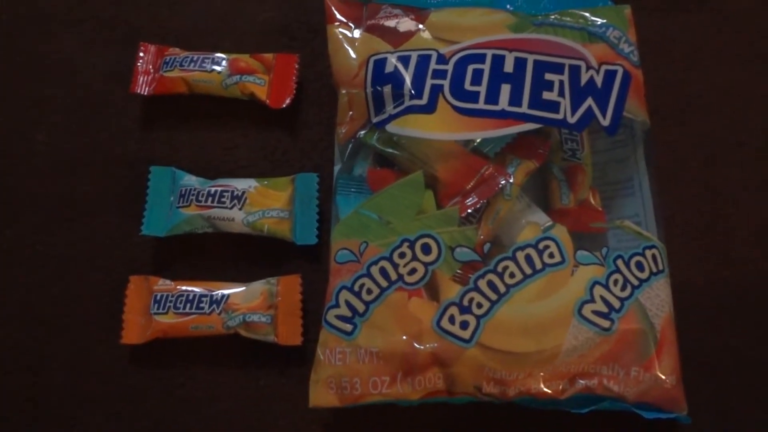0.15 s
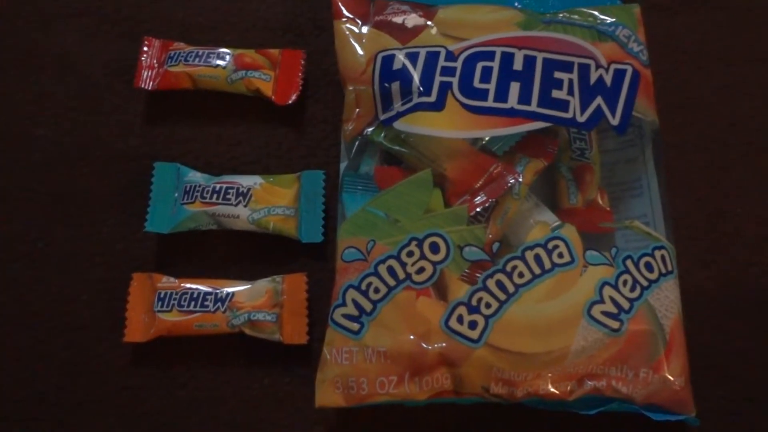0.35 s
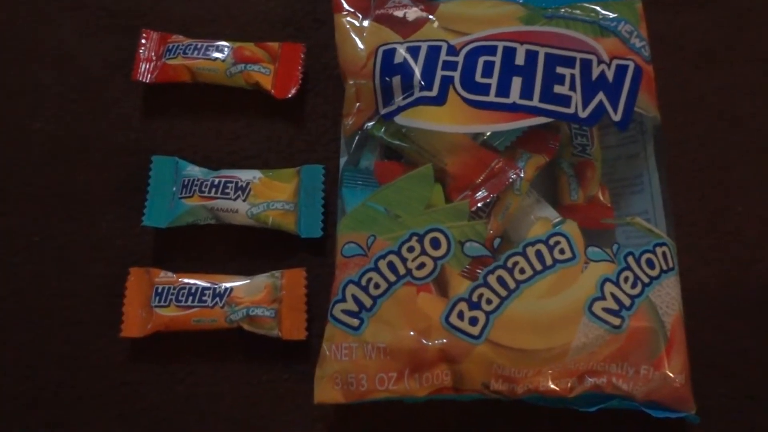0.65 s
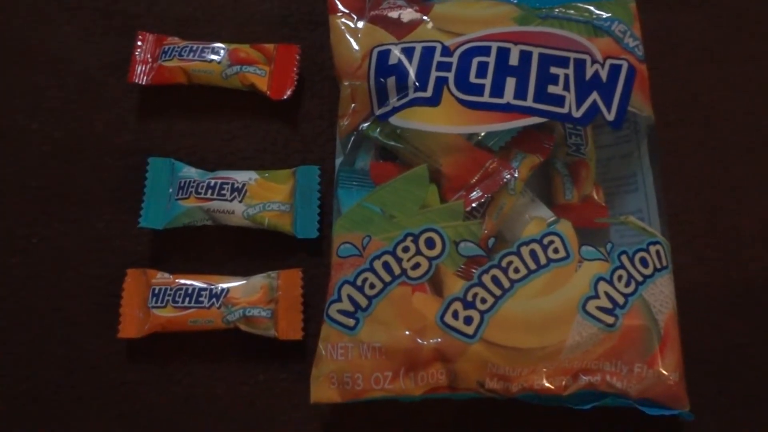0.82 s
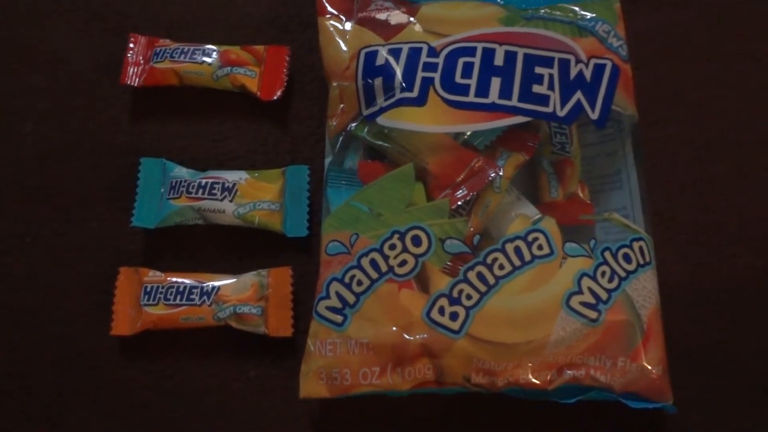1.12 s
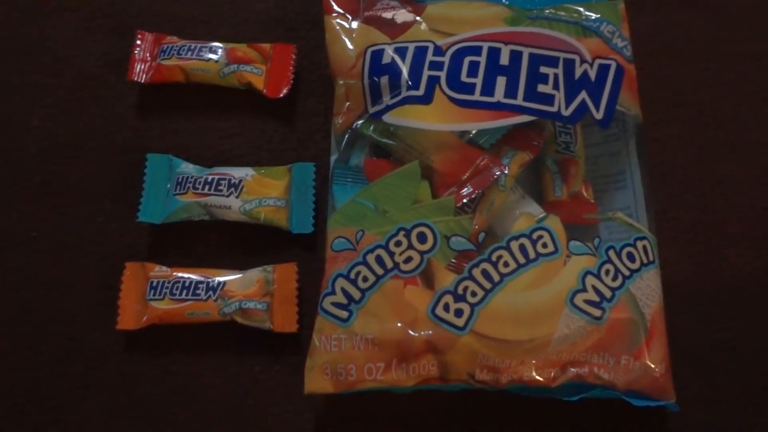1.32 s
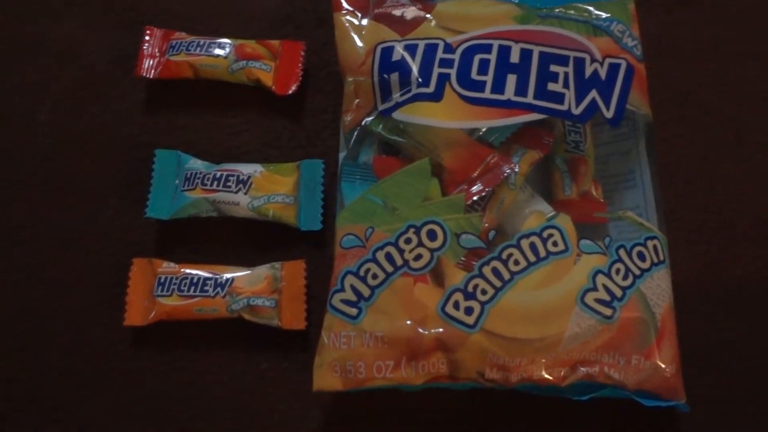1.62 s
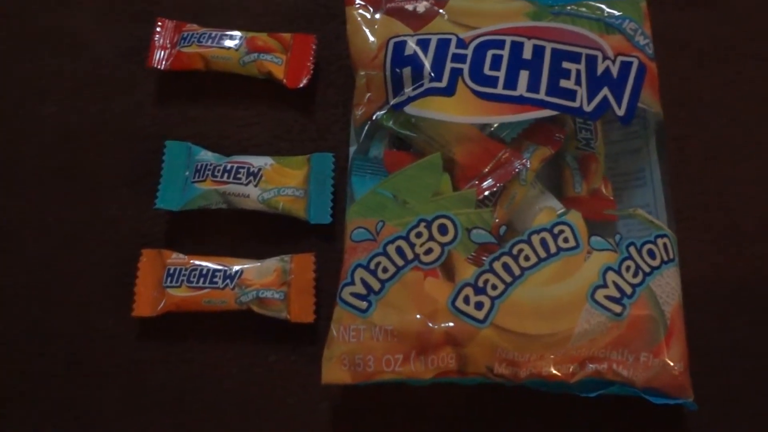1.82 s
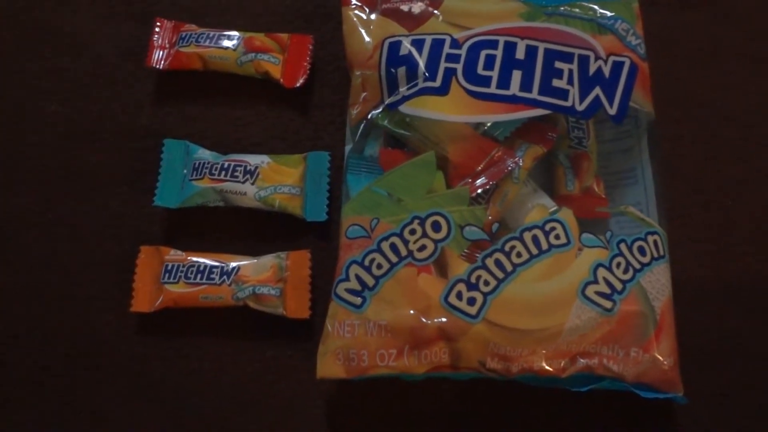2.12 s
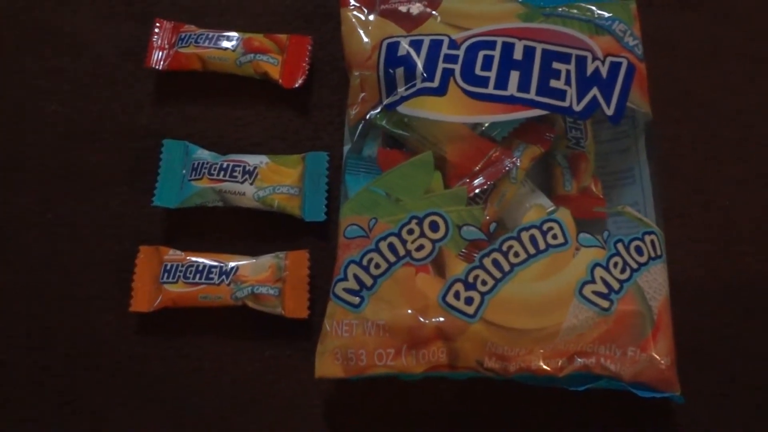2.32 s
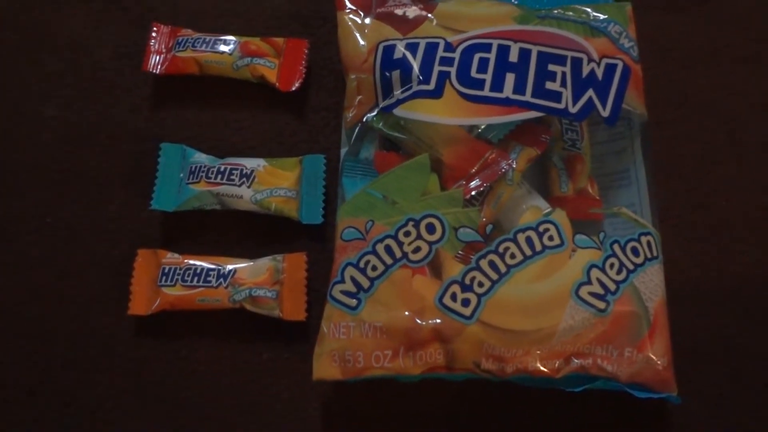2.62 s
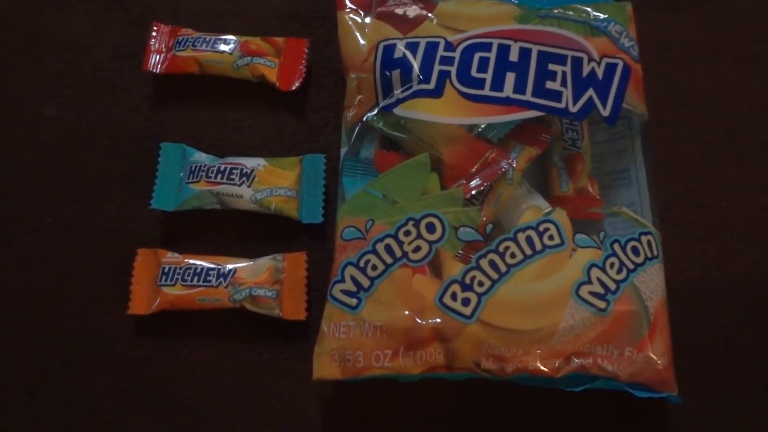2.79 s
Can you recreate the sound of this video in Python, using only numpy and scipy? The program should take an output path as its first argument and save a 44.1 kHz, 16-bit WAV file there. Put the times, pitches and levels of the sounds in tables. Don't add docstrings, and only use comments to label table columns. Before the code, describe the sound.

A small plastic candy wrapper crinkles sharply as fingers twist it open in a quiet room.

```python
import sys
import numpy as np
from scipy import signal
from scipy.fft import rfft, irfft, next_fast_len
from scipy.io import wavfile
from scipy.ndimage import uniform_filter1d, minimum_filter1d

SR = 44100
rng = np.random.default_rng(int(sys.argv[2]) if len(sys.argv) > 2 else 0)


def invert_db(x):
    u = np.asarray(x, float) / 20
    return 10 ** u


def generate_wav(sig):
    pcm = np.round(np.clip(np.atleast_2d(sig).T, -1, 1) * 32767).astype(np.int16)
    wavfile.write(sys.argv[1], SR, pcm)


N = 130095

# (frequency [Hz], density [dB per Hz])
AIR_CENTRE = [(25, -2), (50, -4), (120, -2), (400, -5), (840, -10), (1600, -14), (4000, -17.5),
              (15000, -15.5)]
AIR_DIFFERENCE = [(25, -31), (100, -12), (330, -4), (620, -6), (1500, -9.5), (3600, -16), (8000, -26.5),
                  (15000, -35)]
# (frequency [Hz], level [dB])
FILM_COLOUR = [(450, -33), (1200, -18.5), (2300, -1), (3500, -1.5), (4600, 2.5), (6300, 1), (10500, 0.5),
               (14500, -2)]
# (start [s], hold [s], level [dB], treble over low [dB])
SQUEEZES = [(0.02, 0.081, -55, -7), (0.175, 0.041, -51, -10), (0.206, 0.017, -44, 7),
            (0.253, 0.0062, -38.5, 4), (0.281, 0.0076, -28.5, 0), (0.328, 0.062, -51.5, -6),
            (0.469, 0.0068, -37, -6.5), (0.52, 0.063, -59, -22), (0.582, 0.02, -27.5, 0),
            (0.63, 0.011, -41.5, 17), (0.737, 0.11, -51.5, -5), (0.825, 0.051, -42, -0.5),
            (0.908, 0.063, -50.5, -11), (1.059, 0.16, -41, 3), (1.258, 0.085, -41, -3),
            (1.417, 0.083, -49.5, -8.5), (1.556, 0.048, -38, 9), (1.713, 0.03, -43.5, -13),
            (1.816, 0.02, -40.5, 11), (1.873, 0.013, -52, 14), (1.934, 0.014, -44, 13),
            (1.962, 0.085, -36, 4.5), (2.108, 0.084, -41.5, 15), (2.21, 0.067, -50, 0),
            (2.324, .015, -37.5, 1), (2.383, 0.025, -45.5, -8), (2.427, 0.039, -35.5, 21),
            (2.5, 0.091, -54.5, 26), (2.58, 0.071, -41, 13), (2.8, 0.17, -54.5, -9.5)]
# (start [s], end [s], pitch [Hz], level [dB], glide [Hz per s])
TAUT_PANELS = [(0.317, 0.434, 3160, -22, 0), (0.581, 0.592, 750, -16, 0), (1.08, 1.208, 4600, -29, -2),
               (1.266, 1.361, 6250, -7, 13000), (1.272, 1.352, 3540, -8, 0), (1.564, 1.628, 2190, -11.5, 0),
               (2.478, 2.67, 3160, -7, 2), (2.804, 2.87, 6220, -0.5, -2), (2.82, 2.883, 7640, -7, 0),
               (2.815, 2.923, 9650, -14, 2), (2.864, 2.96, 3200, -4.5, 0), (1.236, 1.343, 2420, -8, 0)]
# (time [s], level [dB], main pitch [Hz])
CREASE_SNAPS = [(0.025, -38.5, 9000), (0.0568, -44, 12600), (0.0838, -38.5, 6260), (0.2057, -24.5, 6070),
                (0.2633, -32, 6740), (0.2777, -29, 10700), (0.2864, -18.5, 9500), (0.3015, -28, 9900),
                (0.3213, -29, 5360), (0.3252, -21.5, 1890), (0.364, -40, 8600), (0.467, -30, 5900),
                (0.475, -32.5, 13300), (0.5189, -43, 4100), (0.588, -15, 9700), (0.597, -25.5, 3600),
                (0.6071, -27, 8900), (0.6497, -34, 2360), (0.6886, -39, 2260), (0.7105, -39.5, 6000),
                (0.8065, -42.5, 9300), (0.8316, -39.5, 4570), (0.8628, -34, 6350), (0.9177, -34, 4600),
                (0.926, -28, 12300), (0.9653, -37.5, 2160), (0.974, -37, 6000), (1.031, -48, 2160),
                (1.0742, -21, 4930), (1.108, -33, 6800),
                (1.1114, -30.5, 5940), (1.118, -27.5, 4840), (1.129, -30.5, 11500), (1.137, -30, 6600),
                (1.1424, -23, 5630), (1.1497, -12.5, 5100), (1.1707, -23.5, 5260), (1.174, -28, 5070),
                (1.273, -48, 2520), (1.368, -38, 3760), (1.4102, -30.5, 4900), (1.4526, -28, 6600),
                (1.5524, -17.5, 6560), (1.5702, -23, 6540), (1.5984, -32.5, 4500), (1.6046, -30.5, 4900),
                (1.6113, -25, 11200), (1.694, -41.5, 6600), (1.721, -34, 9000), (1.747, -40.5, 7700),
                (1.83, -21, 6400), (1.849, -30.5, 6550), (1.872, -25.5, 7760), (1.8798, -15, 6300),
                (1.9016, -28.5, 9400), (1.9388, -38, 8750), (1.97, -27.5, 6700), (1.98, -31, 12300),
                (1.9913, -25, 9300), (1.9981, -18, 6200),
                (2.0054, -30, 3470), (2.0447, -27.5, 4440), (2.0558, -32.5, 5330), (2.101, -27.5, 7840),
              (2.1055, -29, 5000), (2.1154, -32, 3860), (2.139, -28, 2830), (2.1752, -28.5, 12600),
              (2.1953, -31.5, 13000), (2.2191, -35.5, 12400), (2.2537, -36.5, 6250), (2.2845, -38.5, 12600),
              (2.3085, -38.5, 2580), (2.3302, -22, 10500), (2.3379, -17, 11700), (2.419, -36, 10200),
              (2.4278, -11, 8100), (2.4506, -20, 11300), (2.4586, -28, 13500), (2.4969, -32.5, 3540),
              (2.5048, -34.5, 10200), (2.531, -41, 10100), (2.559, -35, 6600), (2.583, -26, 14200),
              (2.6251, -34, 3620), (2.6403, -23, 10100), (2.682, -35.5, 13200), (2.833, -38.5, 2380),
              (2.8454, -38.5, 3500), (2.901, -38.5, 5960)]
# (time [s], level [dB], main pitch [Hz])
FURTHER_SNAPS = [(1.571, -32.5, 2800), (1.8808, -30.5, 1100), (2.1015, -31, 2900), (2, -30, 2800),
                        (1.272, -35, 4300), (1.604, -26.5, 10700), (1.9, -35, 11000), (1.8, -43, 4400),
                        (0.91, -40, 11500), (1.1, -39, 5800), (2, -44, 2600), (1.6793, -49, 8400), (1.5225, -46, 7800),
                        (.9979, -48.5, 2000), (1.2, -47, 5300), (1.9273, -42, 2100),
                        (0.225, -46, 4630), (0.2486, -45, 6700), (0.2588, -37.5, 2970), (0.47, -39, 13200),
                 (0.4839, -37.5, 4020), (0.5733, -43, 4140), (0.6664, -36, 11000), (0.6954, -48, 4500),
                 (1.0693, -34, 10900), (1.085, -33, 4500), (1.1234, -34, 4700), (1.1558, -35, 6200),
                 (1.209, -41, 5460), (1.2277, -40, 4360), (1.3188, -41, 3340), (1.4005, -45, 8050),
                 (1.4165, -37, 3400), (1.427, -40, 6600), (1.5588, -36, 12800), (1.6165, -43, 13600),
                 (1.7926, -44, 10800), (1.8362, -37, 12500), (1.855, -44, 13400), (1.8868, -29, 10300),
                 (1.9326, -38, 9200), (1.988, -33, 12900), (2.0114, -41, 12340), (2.039, -38, 12300),
                 (2.069, -39, 12100), (2.1244, -37, 6300), (2.132, -36, 14100), (2.136, -35, 13100),
                 (2.1494, -33, 12800), (2.156, -36, 8200), (2.2645, -39, 2310), (2.344, -33, 6000),
                 (2.4379, -23, 10900), (2.4426, -31, 8400), (2.4685, -32, 13200), (2.5773, -39.5, 3460),
                 (2.588, -37, 13800), (2.5982, -46, 3130), (2.7622, -55.5, 3380), (2.802, -50, 6370),
                 (2.85, -48, 6300), (2.89, -46, 6000), (2.9117, -47, 3200), (2.9263, -47, 4500)]

AIR_CENTRE_DB, AIR_DIFFERENCE_DB = -57.5, -57
HUM_DB, HUM_HZ = -74, 120
ROOM_DB, ROOM_T60_S, ROOM_WIDTH, ROOM_DULL_HZ = -17, 0.33, 0.3, 12600

PAN_DB, PAN_SPREAD_DB = -0.7, 5
PIVOT_HZ, TILT_SPAN_OCT = 6000, 0.94

RISE_S, RISE_DB_PER_S, SETTLE_DB_PER_S = 0.0052, 1502, 366
CLICKS_PER_S, CLICK_S = 450, 0.0004
CLICK_SPREAD_DB, CLICK_COLOUR_DB, RUB_DB = 3, 5.5, -1
SLIDE_START_S, SLIDE_END_S = 1.25, 1.36
RING_SHARE = 0.16
FLICKER_DB, PATCH_DB = 5, 6.5
PANEL_WIDTH_HZ = 550

SNAP_DB, SNAP_HOLD_S, SNAP_FALL_S, SNAP_SAG_DB = -4, 0.0014, 0.00025, -6
CRACK_DB, SNAP_TILT_DB, RIPPLE_DB = 4, 29, 2.5
MODE_DB, MODE_WIDTH_HZ = 8, 1100
EVEN_SHARE = 0.5


def level(x, db):
    return x * invert_db(db) / np.sqrt(np.mean(x ** 2, axis=-1, keepdims=True) + 1e-20)


def curve(table, hz):
    table_hz, db = np.array(table, float).T
    return np.interp(np.log(np.maximum(hz, 1)), np.log(table_hz), db)


def lean(hz):
    return 0.5 * np.tanh(np.log2(np.maximum(hz, 1) / PIVOT_HZ) / TILT_SPAN_OCT)


def walk(hold_s):
    hold = int(hold_s * SR)
    steps = np.repeat(rng.standard_normal(N // hold + 1), hold)[:N]
    return uniform_filter1d(steps, hold // 2)


def coloured(table):
    size = next_fast_len(N)
    hz = np.arange(size // 2 + 1) * SR / size
    spectrum = rfft(rng.standard_normal(size)) * invert_db(curve(table, hz)) * (hz > 20)
    return level(irfft(spectrum, size)[:N], 0)


def air():
    hum = invert_db(HUM_DB) * np.sin(2 * np.pi * HUM_HZ * np.arange(N) / SR)
    centre = invert_db(AIR_CENTRE_DB) * coloured(AIR_CENTRE)
    difference = invert_db(AIR_DIFFERENCE_DB) * coloured(AIR_DIFFERENCE)
    return centre + hum + difference * np.array([[1], [-1]])


def room(x):
    t = np.arange(SR // 2) / SR
    decay = invert_db(-60 * t / ROOM_T60_S) * np.clip(t / 0.0019, 0, 1)
    mid, side = rng.standard_normal((2, len(t))) * decay
    ports = [mid + ROOM_WIDTH * side, mid - ROOM_WIDTH * side]
    tail = signal.lfilter(*signal.butter(1, ROOM_DULL_HZ, fs=SR), ports)
    tail = tail / np.sqrt((tail ** 2).sum(axis=1, keepdims=True))
    return invert_db(ROOM_DB) * signal.fftconvolve(x.mean(axis=0)[None], tail, axes=1)[:, :N]


def ring(x, hz, width_hz):
    return signal.lfilter(*signal.iirpeak(hz, hz / width_hz, fs=SR), x)


def squeezes(t):
    start, hold, db, tilt_db = np.array(SQUEEZES, float).T[:, :, None]
    settle_db = SETTLE_DB_PER_S * np.maximum(t - start - hold, 0)
    rise_db = RISE_DB_PER_S * np.maximum(start + RISE_S - t, 0)
    power = invert_db(2 * (db - settle_db - rise_db))
    total = power.sum(axis=0) + 1e-14
    return total, (power * tilt_db).sum(axis=0) / total


def taut_panels(drive, t):
    out = np.zeros(N)
    for start, end, hz, db, glide in TAUT_PANELS:
        held = np.clip(np.minimum(t - start, end - t) / RISE_S, 0, 1)
        tone = ring(ring(drive, hz, PANEL_WIDTH_HZ), hz, PANEL_WIDTH_HZ)
        tone = signal.hilbert(tone, next_fast_len(N))[:N]
        tone = np.real(tone * np.exp(1j * np.pi * glide * (t - start) ** 2))
        out += held * level(tone, db) * invert_db(FLICKER_DB / 2 * walk(0.012))
    return out


def rustle():
    t = np.arange(N) / SR
    power, tilt_db = squeezes(t)
    hit = rng.random(N) < CLICKS_PER_S / SR
    not_sliding = (t < SLIDE_START_S) | (t > SLIDE_END_S)
    click_db = np.minimum(CLICK_SPREAD_DB * rng.exponential(size=N), 7)
    clicks = hit * invert_db(click_db) * not_sliding
    click_decay = np.exp(-1 / (CLICK_S * SR))
    out = np.zeros(N)
    for hz in 800 * 2 ** np.arange(0, 4.3, 1 / 4):
        drive = clicks * invert_db(CLICK_COLOUR_DB * rng.standard_normal(N))
        drive = signal.lfilter([1], [1, -click_decay], drive)
        drive = level(drive * rng.standard_normal(N), 0)
        drive = drive + invert_db(RUB_DB) * rng.standard_normal(N)
        patchy_db = FLICKER_DB * walk(0.008) + PATCH_DB * walk(0.04)
        gain_db = curve(FILM_COLOUR, hz) + tilt_db * lean(hz) + patchy_db
        out += ring(drive, hz, RING_SHARE * hz) * invert_db(gain_db)
    out = out / np.sqrt(uniform_filter1d(out ** 2, SR // 25) + 1e-12)
    out = out + taut_panels(drive, t)
    return out * np.sqrt(power) * invert_db(np.array([[PAN_DB], [-PAN_DB]]) / 2)


def snap_colour(hz):
    size = 256
    f = np.arange(1, size + 2) * SR / (2 * size)
    chance = rng.random((3, len(hz), 1))
    ripple = sum(np.sin(2 * np.pi * (f / (1900 * 1.6 ** k) + chance[k])) for k in range(3))
    mode = np.exp(-0.5 * ((f - hz[:, None]) / MODE_WIDTH_HZ) ** 2)
    tilt_db = SNAP_TILT_DB * lean(hz)[:, None] * lean(f)
    colour_db = curve(FILM_COLOUR, f) + tilt_db + MODE_DB * mode + RIPPLE_DB * ripple
    cepstrum = irfft(np.log(invert_db(colour_db)))
    cepstrum[:, 1:size] *= 2
    cepstrum[:, size + 1:] = 0
    return np.exp(rfft(cepstrum))


def snaps(rows):
    at, db, hz = np.array(rows, float).T
    size = 256
    t = np.arange(size) / SR
    shape = invert_db(SNAP_SAG_DB * t / SNAP_HOLD_S) * np.exp(-np.maximum(t - SNAP_HOLD_S, 0) / SNAP_FALL_S)
    push = rng.standard_normal((len(at), size)) * shape
    push[:, 1] += 4 * invert_db(CRACK_DB)
    grit = rfft(push, 2 * size)
    grit = grit / np.abs(grit) ** EVEN_SHARE
    snap = irfft(grit * snap_colour(hz))[:, :size] * np.cos(np.pi / 2 * t / t[-1])
    snap = level(snap, 0) * invert_db(db + SNAP_DB)[:, None]
    pan_db = PAN_DB + PAN_SPREAD_DB * rng.uniform(-1, 1, (len(at), 1))
    out = np.zeros((2, N + size))
    where = (at * SR).astype(int)[:, None] + np.arange(size)
    np.add.at(out[0], where, snap * invert_db(pan_db / 2))
    np.add.at(out[1], where, snap * invert_db(-pan_db / 2))
    return out[:, :N]


def scene():
    creases = snaps(CREASE_SNAPS)
    wrapper = creases + rustle() + snaps(FURTHER_SNAPS)
    return wrapper + room(wrapper) + air()


def roll_off(x):
    return signal.sosfilt(signal.butter(12, 16820, fs=SR, output="sos"), x)


def record(dry):
    peak = np.abs(dry).max(axis=0) + 1e-9
    gain = minimum_filter1d(np.minimum(1, 0.45 / peak), size=41)
    limited = dry * uniform_filter1d(gain, size=31)
    top_cut = signal.ellip(8, 0.2, 30, 15750, fs=SR, output="sos")
    return roll_off(signal.sosfilt(top_cut, limited))


dry = scene()
out = record(dry)
generate_wav(out)
```